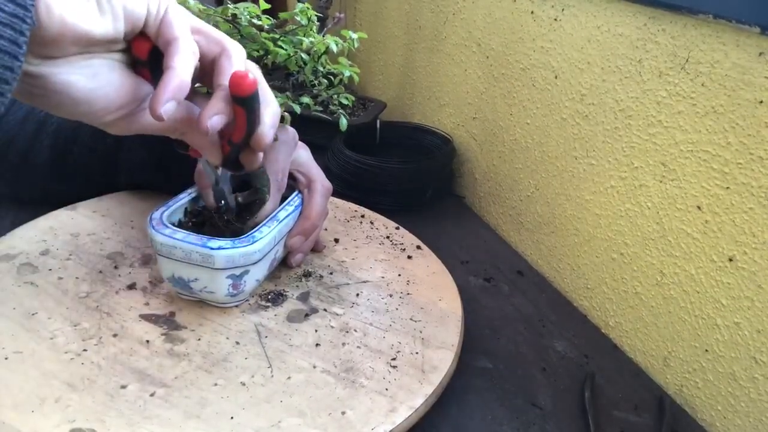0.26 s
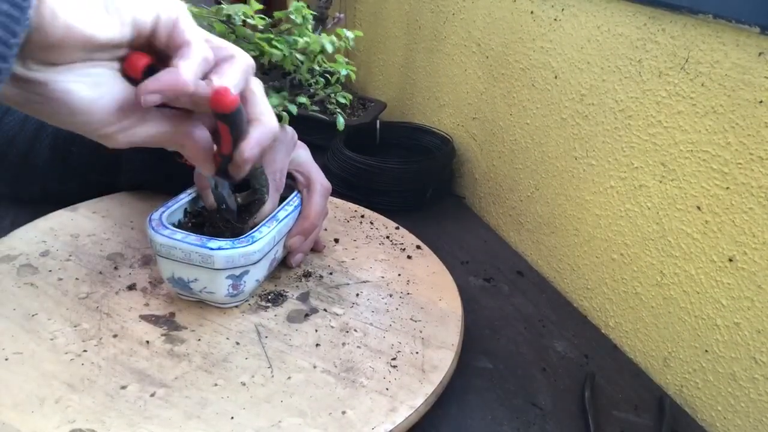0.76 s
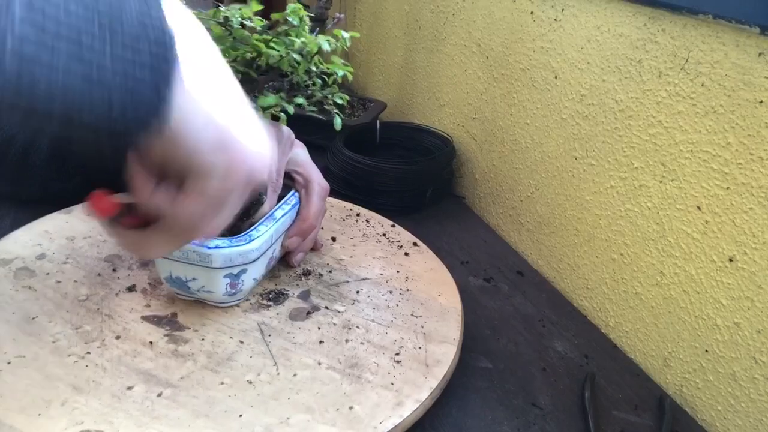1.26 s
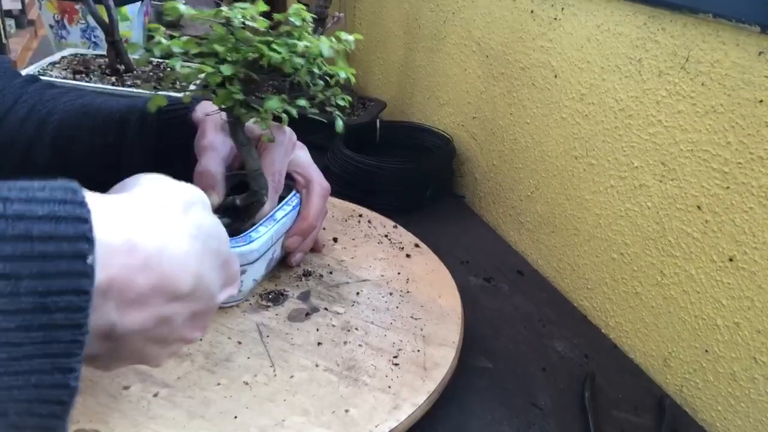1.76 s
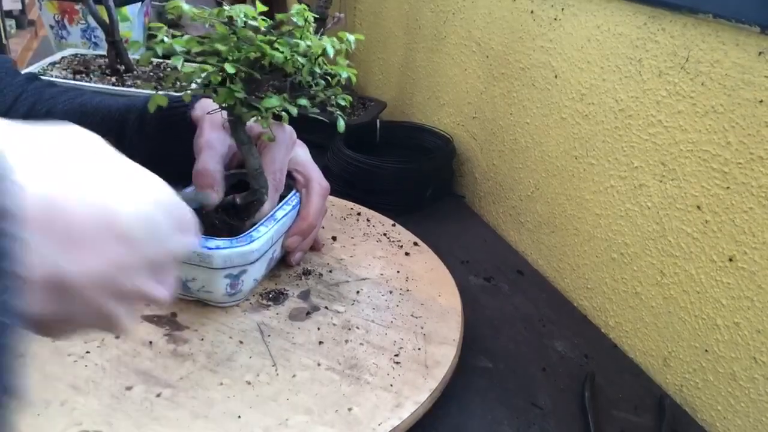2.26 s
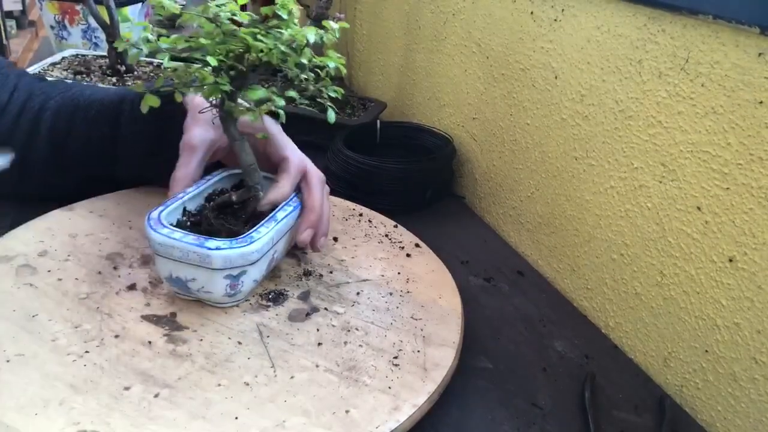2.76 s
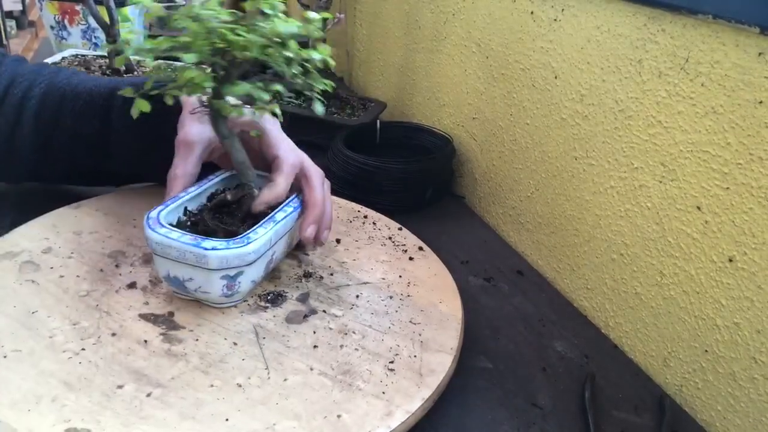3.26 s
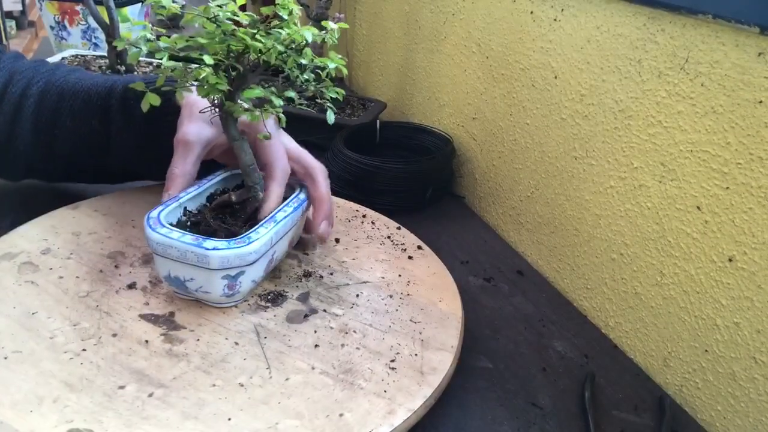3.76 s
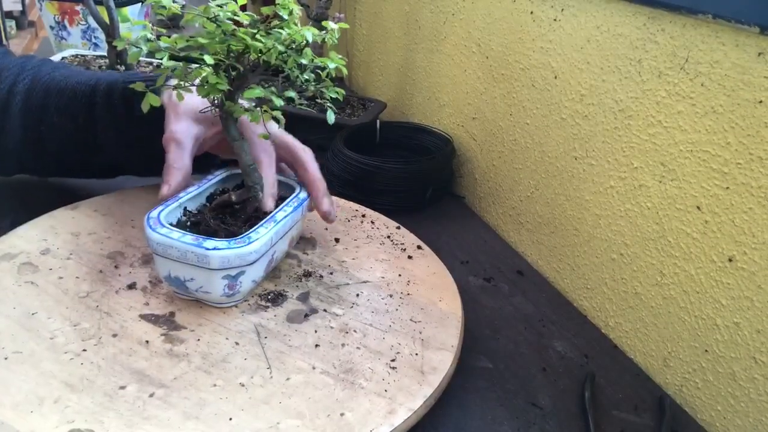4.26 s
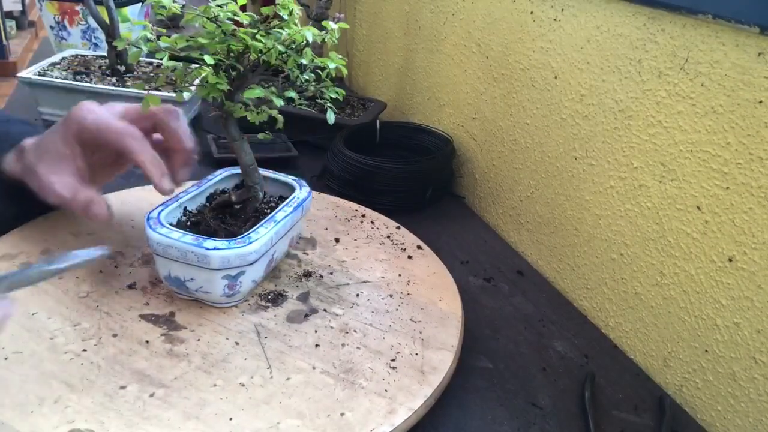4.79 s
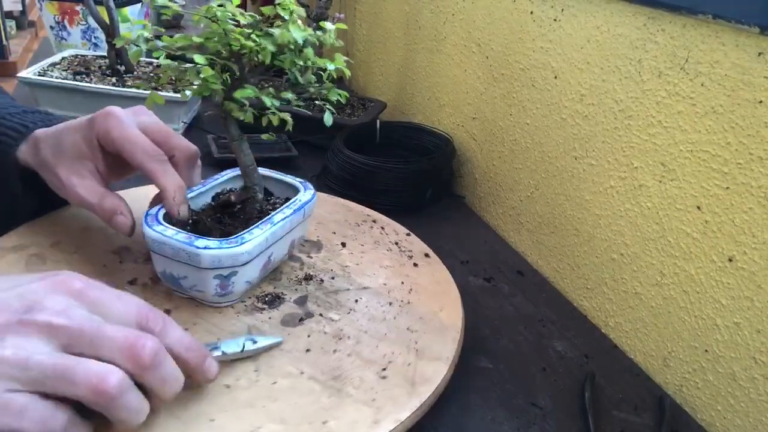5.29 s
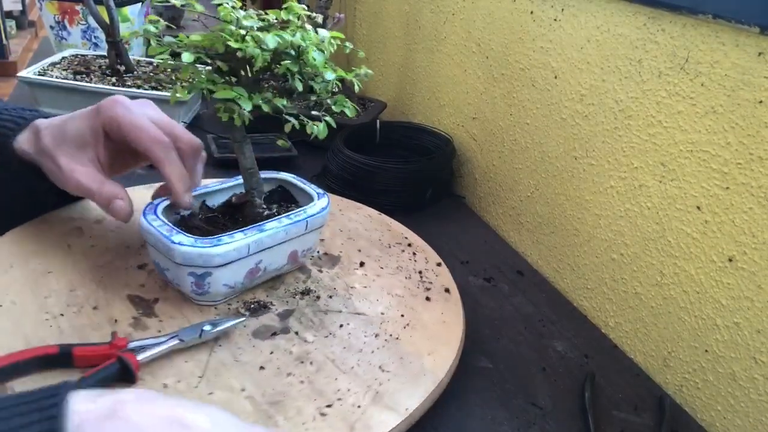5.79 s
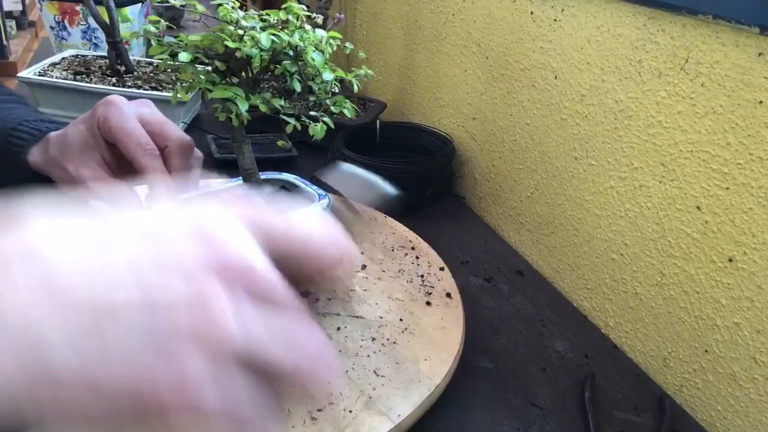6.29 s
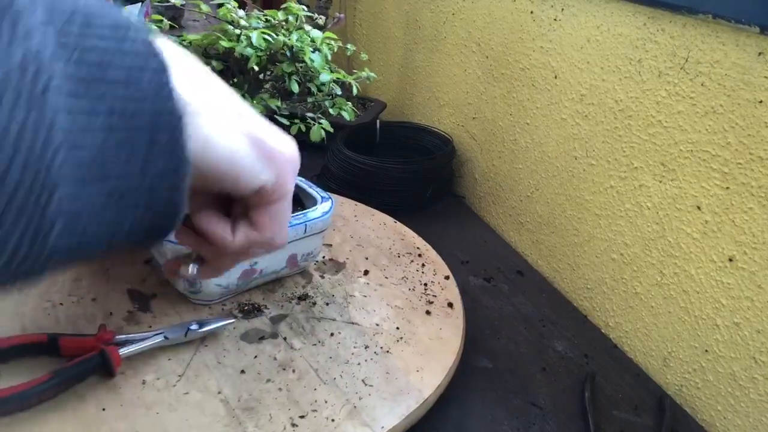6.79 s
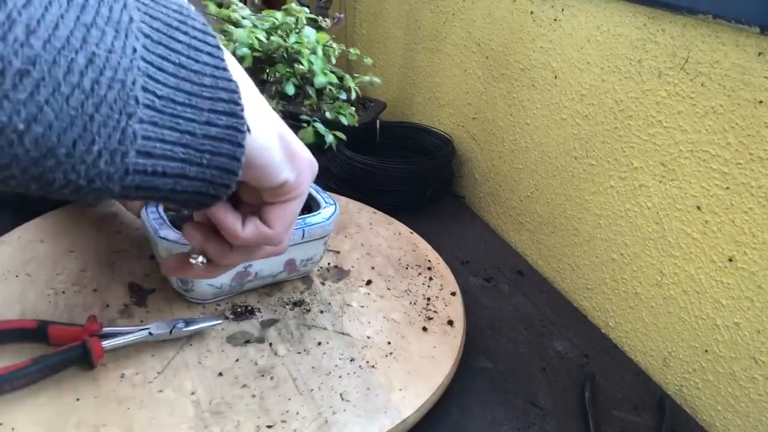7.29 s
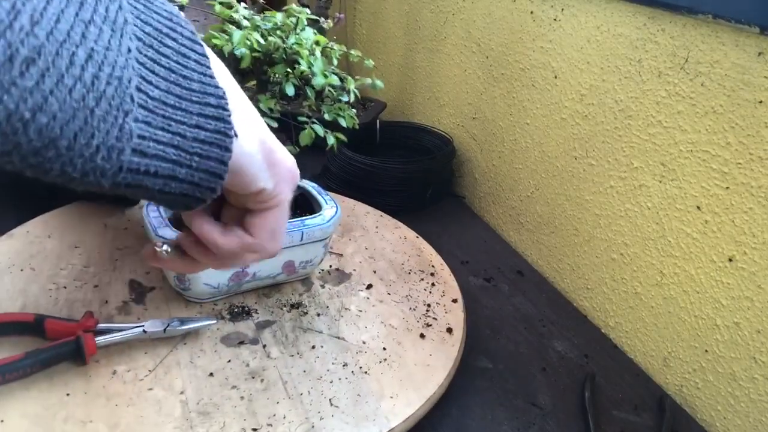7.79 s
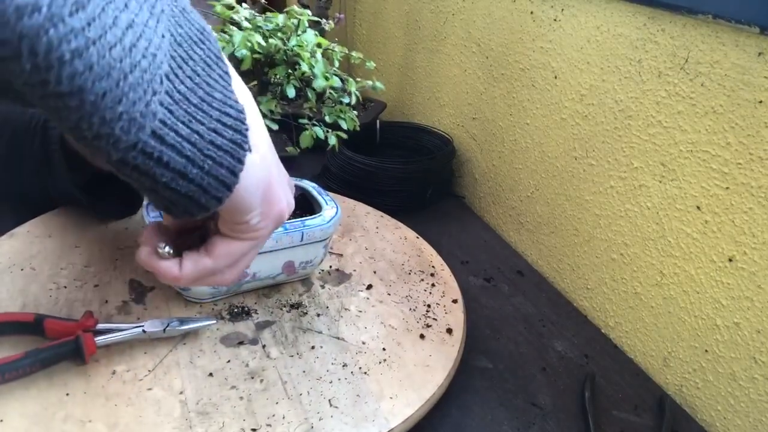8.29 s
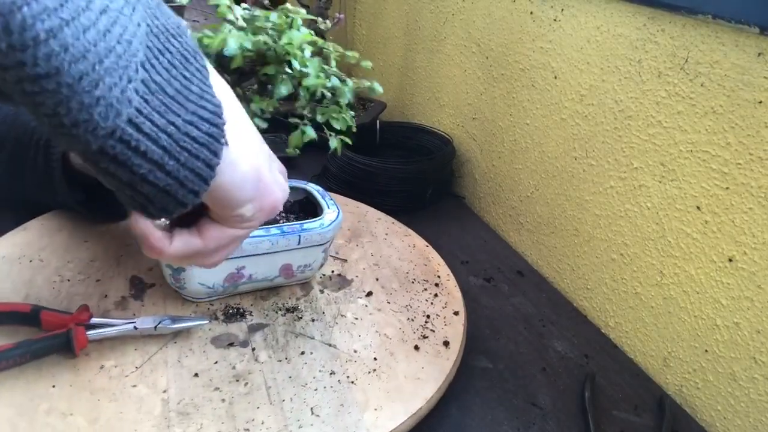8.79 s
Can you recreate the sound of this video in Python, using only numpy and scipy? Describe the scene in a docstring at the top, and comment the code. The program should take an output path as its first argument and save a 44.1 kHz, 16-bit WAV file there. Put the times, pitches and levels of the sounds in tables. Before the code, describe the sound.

Quiet close handling of a glazed pot on a wooden board, a sudden bouncing clatter of pliers, then ceramic knocks and a sharp wire snip.

```python
"""Wiring a small glazed pot

Pliers twist a thin wire tight in a pot, which rocks, grinds and clinks on a round wooden work table.
The pliers clatter down, cutters are dragged off the board, knock against the pot and snip the wire.
Blows are short noise bursts and dying tones; scrapes, rubbing and rustle are tiny random slips,
filtered to the sound of each body. Hands and sleeves rustle; the walls of a quiet yard answer."""
import sys
import numpy as np
from scipy import signal
from scipy.fft import rfft, irfft, next_fast_len
from scipy.io import wavfile
from scipy.ndimage import map_coordinates

SR = 44100
rng = np.random.default_rng(int(sys.argv[2]) if len(sys.argv) > 2 else 0)


def master_out(mix):
    """Clip the mix to full scale and print it as 16-bit PCM to the path in sys.argv[1]."""
    frames = np.transpose(np.atleast_2d(mix))
    ceiling = np.clip(frames, -1, 1)
    pcm = np.round(ceiling * 32767).astype(np.int16)
    wavfile.write(sys.argv[1], SR, pcm)


N = 399105  # length in samples
T = np.arange(SR // 2) / SR  # the life of one blow (s)


def amp(db):
    """Turn dB into gain."""
    return 10 ** (np.asarray(db) / 20)


def unit(x):
    """Scale x to rms 1."""
    return x / np.sqrt(np.mean(x ** 2) + 1e-20)


def along(points, hz):
    """Read a curve of (f/Hz, value) points, straight on a log frequency axis."""
    f, v = np.transpose(points)
    return np.interp(np.log(hz + 1), np.log(f + 1), v)


def wobble(rate):
    """A smooth random curve with rate knots a second."""
    knots = rng.standard_normal(int(N * rate / SR) + 4)
    return map_coordinates(knots, [np.arange(N) * rate / SR])


def coloured(x, level):
    """Filter x, without any pre-echo, so that its gain in dB is level(Hz)."""
    m = 2 * next_fast_len(len(x) // 2 + 4096)
    cepstrum = irfft(np.log(amp(level(np.fft.rfftfreq(m, 1 / SR))) + 1e-6))
    # folding the cepstrum forward in time gives the minimum-phase filter
    cepstrum[1:m // 2] *= 2
    cepstrum[m // 2 + 1:] = 0
    return irfft(rfft(x, m) * np.exp(rfft(cepstrum)))[:len(x)]


def shaped(x, spectrum):
    """Filter x along a table of (f/Hz, level/dB) points."""
    return coloured(x, lambda hz: along(spectrum, hz))


def add(track, s, sound):
    """Mix a sound in at time s."""
    part = track[max(round(s * SR), 0):][:len(sound)]
    part += sound[:len(part)]


# how long the yard echoes: f/Hz, time to fall by 60 dB t60/s
YARD = [(90, 0.57), (260, 0.477), (700, 0.34), (2000, 0.36), (5000, 0.31), (14000, 0.29)]


def in_yard(x, wet_db):
    """Add a fresh diffuse echo in which each frequency dies at its own speed."""
    hz, t, z = signal.stft(rng.standard_normal(len(T)), SR, nperseg=256)
    fade = amp(-60 * t / along(YARD, hz)[:, None])
    tail = signal.istft(z * fade, SR, nperseg=256)[1][:len(T)]
    tail *= 1 - np.exp(-T / 0.0023)  # the echo swells in softly
    return x + amp(wet_db) * signal.fftconvolve(x, tail / np.linalg.norm(tail))[:len(x)]


def burst(spectrum, t60, chatter_db):
    """A sharp push and its dying micro-contacts, filtered; rms 0.1 over half a second."""
    chatter = rng.standard_normal(len(T)) * np.exp(-np.log(1000) * T / t60)
    force = amp(chatter_db) * chatter / np.linalg.norm(chatter)
    force[0] += 1
    return unit(shaped(force, spectrum)) / 10


def ring(modes, colour, rise, scatter_db):
    """Dying tones that build up over a few cycles; strengths and pitches vary from blow to blow."""
    hz, db, t60 = np.transpose(modes)[:, :, None]
    chance = rng.standard_normal((len(modes), 2, 1))
    level = amp(db + along(colour, hz) + scatter_db * chance[:, 0])
    life = np.exp(-np.log(1000) * T / t60) * (1 - np.exp(-(T * hz / rise) ** 2))
    tones = np.sin(2 * np.pi * hz * T * (1 + 0.0095 * chance[:, 1]))
    return np.sum(level * life * tones, axis=0)


def grit(rate, spread_db, smooth):
    """Friction force: rate tiny uneven slips a second over a smooth hiss, bunched in clumps."""
    sizes = rng.standard_normal(N) * amp(spread_db * rng.standard_normal(N))
    slips = (rng.random(N) < rate / SR) * sizes
    clumps = amp(2.5 * wobble(160))
    return unit(clumps * (unit(slips) + smooth * rng.standard_normal(N)))


def through(force, resonances, valley_db, bright):
    """Friction heard through a body's resonances, tilted by bright dB per octave above 1 kHz; rms 1."""
    def level(hz):
        power = amp(2 * valley_db) * (hz > resonances[0][0])  # the floor between the peaks
        for centre, width, db in resonances:
            power = power + amp(2 * db) / (1 + (2 * (hz - centre) / width) ** 2)
        return 10 * np.log10(power) + bright * np.log2(np.maximum(hz, 1000) / 1000)

    return unit(coloured(force, level))


def strokes(rows, resonances, force, valley_db):
    """Short friction strokes sounding through a body's resonances."""
    out = np.zeros(N)
    for start, end, db, bright in rows:
        slips = force[int(start * SR):][:max(int((end - start) * SR), 64)]
        slips = slips * signal.windows.tukey(len(slips), .4)
        slips = np.pad(slips, (0, len(slips)))  # room for the body to ring on
        add(out, start, amp(db) * through(slips, resonances, valley_db, bright))
    return out


# the steady hush: f/Hz, level/dB
AIR = [(15, -53.5), (25, -20.5), (53, -4.5), (117, -4), (206, -6), (317, -7), (354, -8), (936, -17),
       (1560, -22), (1940, -24), (4870, -26.5), (5280, -26), (16000, -35)]


def air():
    """The steady hush of the yard: filtered noise."""
    return amp(-69.5) * unit(shaped(rng.standard_normal(N), AIR))


MOVE_ATTACK_S, MOVE_RELEASE_S = 0.018, .07  # half the fade-in, the whole fade-out


def held(start, end):
    """Attack, hold and release of one movement of the hand."""
    t = np.arange(N) / SR
    attack = np.interp(t, [start - MOVE_ATTACK_S, start + MOVE_ATTACK_S], [0, 1])
    return attack * np.interp(t, [end, end + MOVE_RELEASE_S], [1, 0])


# the hands twist, steady the pot or reach for a tool:
# start t/s, end t/s, effort level/dB, rustle over effort level/dB
MOVES = [(0.0, 0.165, -66.5, -14), (0.686, 1.06, -64, -9.5), (1.02, 1.396, -69, -5.5),
         (1.46, 1.806, -68.5, -5.5), (1.812, 2.026, -66, -27), (2.093, 2.268, -58, -10),
         (2.36, 3.32, -72, -7.5), (3.856, 3.96, -74, -5), (4.327, 5.212, -77.5, -2),
         (5.227, 5.633, -58, -11), (6.046, 6.17, -62.5, -5), (6.178, 6.487, -71, -1.5),
         (6.5, 6.887, -75.5, -2.5), (6.873, 7.947, -67, -10.5), (8.122, 8.474, -68.5, -11),
         (8.877, 8.993, -57, -11)]
# low rumble of the table: f/Hz, level/dB per Hz
RUMBLE = [(21, -51.5), (35, -28), (76, 2.5), (108, 0), (176, 1), (294, -13), (400, -10), (502, -22),
          (559, -9), (600, -28.5), (780, -44), (1320, -120)]
# rubbing on the wood: f/Hz, level/dB per Hz
RUB = [(260, -57), (450, -10.5), (526, -6), (846, 2), (1130, -6.5), (1310, -8), (1910, -15.5),
       (2020, -19.5), (2420, -15.5), (3270, -23), (4000, -20.5), (5200, -50.5), (8800, -120)]
# sleeves and leaves: f/Hz, level/dB
RUSTLE = [(1180, -24.5), (2000, -5), (2710, -1), (3200, -7), (4530, -4.5), (4990, -3), (5780, -9),
          (7570, -6), (9330, -18), (13100, -12), (16000, -15)]


def handling():
    """With each move the table rumbles, the pot's foot rubs on it, and sleeves and leaves rustle."""
    effort, brushing = np.zeros(N), np.zeros(N)
    for start, end, db, rustle_db in MOVES:
        move = amp(db) * held(start, end)
        effort = np.maximum(effort, move)
        brushing = np.maximum(brushing, amp(rustle_db) * move)
    rumble = unit(shaped(rng.standard_normal(N), RUMBLE)) * amp(1.9 * wobble(25))
    rub = unit(shaped(grit(rate=220, spread_db=1.5, smooth=0.63), RUB)) * amp(-5 + 1.1 * wobble(21))
    crinkle = grit(rate=700, spread_db=3, smooth=1.2)  # small catches of wool and leaves
    rustle = unit(shaped(crinkle, RUSTLE)) * amp(1.1 * wobble(48))
    return effort * rumble + in_yard(effort * rub + brushing * rustle, wet_db=-17)


# the pot's foot judders: start t/s, end t/s, level/dB before trim, brightness/dB per octave
SKIDS = [(0.0, 0.03, -50, -5), (0.022, 0.06, -49.5, -27), (0.89, 0.955, -50, -4), (0.965, 1.045, -56.5, 1),
         (2.105, 2.135, -45, -0.5), (2.14, 2.26, -55.5, 2), (8.715, 8.735, -38, -4.5),
         (8.95, 8.995, -58, -6)]
# resonances of the foot on wood: f/Hz, width/Hz, level/dB
SOLE = [(805, 44, 2), (834, 37, 2.5), (990, 68, -5)]


def skids():
    """The pot's foot judders across the wood in uneven slips."""
    force = grit(rate=840, spread_db=3.0, smooth=0.8)
    return in_yard(amp(-7) * strokes(SKIDS, SOLE, force, valley_db=-32.0), wet_db=-11.5)


# steel on wire and rim: start t/s, end t/s, level/dB before trim, brightness/dB per octave
GRINDS = [(0.0, 0.055, -70, -0.5), (0.875, 0.975, -57.5, -7), (0.905, 0.945, -54, -5.5),
          (2.1, 2.137, -54, -3), (5.94, 5.995, -46, -11.5), (8.904, 8.919, -45, -6),
          (8.934, 8.96, -48.5, -7), (8.957, 8.983, -45.5, -10)]
# resonances of the rim: f/Hz, width/Hz, level/dB
RIM = [(643, 20, -7), (873, 34, -2.5), (1350, 40, -4), (2347, 53, 0), (2780, 460, -6), (3700, 76, -1.5),
       (4240, 54, -2.5), (4860, 210, -3)]


def grinds():
    """Steel grinds on wire and rim, and its slips excite the rim's resonances."""
    force = grit(rate=1100, spread_db=2, smooth=.4)
    return in_yard(amp(-2) * strokes(GRINDS, RIM, force, valley_db=-17), wet_db=-11.5)


# light strokes along the glaze: start t/s, end t/s, level/dB before trim, brightness/dB per octave
GLIDES = [(0.0, 0.07, -83, 22), (0.96, 1.2, -72, 1), (1.5, 1.66, -64, -11.5), (2.405, 2.525, -55, -8),
          (3.15, 3.35, -80, 1), (3.86, 3.96, -67.5, 5)]
# resonances of the glaze: f/Hz, width/Hz, level/dB
GLAZE = [(1460, 280, -6.5), (1970, 140, -2.5), (4920, 120, 17), (5940, 200, -21), (7660, 400, -3)]


def glides():
    """Steel strokes lightly along the glaze, in many fine slips."""
    force = grit(rate=2500, spread_db=-7, smooth=0.79)
    return in_yard(amp(-12) * strokes(GLIDES, GLAZE, force, valley_db=-17), wet_db=-11.5)


# wire and jaws tick: t/s, level/dB before trim, treble over middle level/dB
TICKS = [(0.1615, -58.5, -6), (0.8397, -54.5, -2), (1.337, -60, -25), (1.485, -60.5, -17), (1.67, -63, -31),
         (1.844, -56.5, -23), (2.3105, -56.5, -12), (4.3598, -56.5, -17.5), (4.5537, -61.5, -13),
         (5.6982, -30.5, -1.5), (6.0372, -29, -25), (7.101, -64, -7), (7.445, -61, -4),
         (7.8516, -40.5, -20.5), (7.8997, -57.5, -14)]
# sound of one tick: f/Hz, level/dB per Hz
TICK = [(500, -15), (1200, -1), (2500, -1.5), (3800, 0.5), (5300, 5.5), (7300, 5.5), (9500, -1.5),
        (16000, -18.5)]


def ticks():
    """Wire and jaws tick as they shift: short bright bursts."""
    out = np.zeros(N)
    for s, db, treble in TICKS:
        tick = burst(TICK, t60=0.037, chatter_db=23.0)
        tick = shaped(tick, [(2500, -treble / 2), (6000, treble / 2)])
        add(out, s, amp(db - 3) * in_yard(tick, wet_db=-10.0))
    return out


# tones of the table top: f/Hz, level/dB, time to fall by 60 dB t60/s
TABLE = [(79, 3, .5), (104, -11, .16), (150, -10, .08), (171, -6, .11), (210, -13, .05), (262, -9, .07),
         (330, -11, .04), (405, -11, .07)]
HEAVY_DB = -24  # a bump this heavy sways the whole stand
LIGHT_LOSS = 0.48  # dB lost by the deepest tone for each dB a bump is lighter


def boom(db):
    """The table top's ring; the lighter the bump, the weaker its deepest tone."""
    colour = [(80, LIGHT_LOSS * (db - HEAVY_DB)), (150, 0.0095)]
    return amp(db) * ring(TABLE, colour, rise=0.71, scatter_db=7.5)


def rock(start_hz, end_hz, settle, t60):
    """The foot bounces on the wood; the contact softens as the load eases, so its pitch falls."""
    hz = end_hz + (start_hz - end_hz) * np.exp(-T / settle)
    hz = hz * (1 + 0.031 * rng.standard_normal())
    life = np.exp(-np.log(1000) * T / t60) * (1 - np.exp(-T / 0.00058))
    return np.sin(2 * np.pi * np.cumsum(hz) / SR) * life


# tones of the pot on its table: f/Hz, level/dB, time to fall by 60 dB t60/s
POT = [(658, -14, 0.18), (816, -11.5, 0.098), (928, -3, 0.036), (1340, -2, 0.029), (1537, 1, 0.025),
       (1964, -3.5, 0.097), (2025, -10, 0.029), (2633, -9.5, 0.054), (2540, -7, 0.013), (4550, -4.5, 0.027),
       (4940, 7, 0.016), (5200, -8.5, 0.013), (6460, 2, 0.022), (8380, -13, 0.027), (10140, -11.5, 0.026)]
# chatter of the foot: f/Hz, level/dB per Hz
FOOT = [(200, -27.5), (550, -5.5), (720, 11.5), (850, 5.5), (1050, -19), (1350, -26), (2500, -13),
        (6000, -58)]


def pot_blow(knock, wall, ping, thump):
    """One contact: the foot rocks and chatters, wall and glaze ring, the table thumps (all in dB)."""
    colour = [(1100, knock), (1900, wall), (2900, wall), (4500, ping)]
    clink = amp(1.0) * ring(POT, colour, rise=1.18, scatter_db=2.66)
    clink += amp(ping - 12.0) * burst(TICK, t60=0.045, chatter_db=-3)
    clink += amp(knock - 6.5) * rock(start_hz=1042, end_hz=677.5, settle=0.01127, t60=0.11)
    clink += amp(knock - 12) * burst(FOOT, t60=.06, chatter_db=8)
    clink += amp(thump + 4.0) * burst(RUMBLE, t60=0.23, chatter_db=6.5)
    clink += boom(thump - 7)
    return in_yard(clink, wet_db=-10)


# the pot is knocked and rocks, all before each part's trim: t/s, foot knock level/dB,
# hardness (wall's ring over the knock) level/dB, table's thump over the knock level/dB
POT_HITS = [(0.325, -53, -43, -3.5), (1.123, -43, -24, -12), (1.215, -49.5, -39, -34),
            (1.713, -42, -30, -1.5), (1.947, -42.5, -26, -5), (2.436, -44.5, -15, -15),
            (2.544, -52.5, -12, 4.5), (2.859, -45, -23, -5.5), (2.939, -34, -29, -19),
            (3.32, -55, -13, 1.5), (7.066, -32, 0, -18.5), (7.209, -59, -11, -5), (7.409, -40, -7.5, -21.5),
            (7.424, -36, -33, -12), (7.542, -44.5, -27, -22), (7.691, -23.5, -9.5, -25.5),
            (7.793, -46, -36, -10.5), (7.936, -40, -21, -25), (8.151, -51, -40, -30),
            (8.294, -34, -20.5, -21), (8.734, -35, -23.5, -13), (8.891, -48, -15, 1.5)]
# steel tips graze the glaze and miss the foot:
# t/s, wall level/dB, ping over the wall's ring level/dB
TINKS = [(2.946, -44.5, -4), (3.062, -46, 0.5)]
GLAZE_DB = -17  # on a knock, the glaze's ping over the wall's ring
TINK_KNOCK_DB = -23  # what reaches foot and table from a graze


def pot():
    """Soft contacts rock the pot on its foot and thump the table; hard ones also ring wall and glaze."""
    out = np.zeros(N)
    for s, db, hardness, thump in POT_HITS:
        wall = db + hardness
        add(out, s, pot_blow(db, wall, wall + GLAZE_DB, db + thump))
    for s, db, ping in TINKS:
        add(out, s, pot_blow(db + TINK_KNOCK_DB, db, db + ping, db + TINK_KNOCK_DB))
    return out


# hands and padded handles bump the table: t/s, level/dB
BUMPS = [(0.723, -48.5), (0.772, -58), (1.05, -50.5), (1.352, -53), (1.844, -59), (1.874, -51), (2.24, -58),
         (4.889, -50.5), (5.409, -29.5), (5.511, -36), (5.695, -48), (5.901, -54), (6.008, -34.5),
         (6.949, -57), (8.205, -51), (8.37, -50), (8.681, -44)]


def table():
    """The round top booms briefly on its stand when bumped."""
    out = np.zeros(N)
    for s, db in BUMPS:
        add(out, s, boom(db))
    return out


# skin and sleeve against leaves and soil:
# start t/s, end t/s, level/dB before trim, brightness/dB per octave
BRUSHES = [(1.74, 1.79, -61, -4.5), (2.085, 2.11, -71, -1), (2.225, 2.275, -60, -2.5),
           (3.225, 3.275, -65, -3), (3.85, 3.885, -68.5, -0.5), (4.975, 5.12, -62.5, -3),
           (6.89, 6.93, -60.5, -8.5), (7.57, 7.62, -67, -2.5)]
# broad resonances of the leaves: f/Hz, width/Hz, level/dB
LEAVES = [(1800, 850, -2.5), (2830, 800, -1), (4930, 1100, 2.5), (7300, 1200, 3.5), (13000, 3700, -3)]


def brushes():
    """Skin and sleeve brush past leaves and soil in small catches."""
    force = grit(rate=540, spread_db=0, smooth=0.71)
    return in_yard(amp(-6.5) * strokes(BRUSHES, LEAVES, force, valley_db=-19.5), wet_db=-11.5)


# dull blows on the board: t/s, level/dB, bass relative level/dB, clack relative level/dB
THUDS = [(4.885, -55.5, 6, -1), (5.693, -32, 4, -8), (5.769, -18.5, -4.5, -0.5), (6.005, -27, 10, -5),
         (6.0137, -19.5, -3, -1.5), (6.019, -23, -8.5, 1.5), (6.034, -29, -19, 8), (6.046, -34, 9, 5),
         (6.062, -51, -14, -10), (6.091, -36.5, 6.5, -21)]
# sound of the struck board: f/Hz, level/dB per Hz
BOARD = [(40, -22.5), (90, -7), (250, 2.5), (450, 0.5), (950, -3), (1150, -3), (1350, 0), (1600, -6),
         (2200, -7.5), (2900, -20), (3700, -18.5), (5000, -36), (8000, -39), (15000, -55.5)]


def thuds():
    """Padded handles and knuckles knock the board as the cutters are taken up."""
    out = np.zeros(N)
    for s, db, bass, clack_db in THUDS:
        push = burst(BOARD, t60=.025, chatter_db=6)
        blow = shaped(push, [(450, bass), (1300, clack_db)])
        add(out, s, amp(db) * in_yard(blow, wet_db=-6.0))
    return out


def clack(hz, arrival, length):
    """The first bending wave of a blow: a short packet that passes before the tones ring on."""
    packet = np.exp(-((T - arrival) / length) ** 2)
    return packet * np.sin(2 * np.pi * hz * T * (1 + 0.029 * rng.standard_normal()))


# the pliers land and bounce:
# t/s, pitch of the contact f/Hz, level/dB, crack over the blow level/dB before trim
PLIER_HITS = [(5.267, 1170, -45, -6), (5.303, 2720, -42, 1), (5.3162, 1605, -14.5, -13),
              (5.3345, 2500, -39, -6), (5.345, 1680, -19.5, -10.5), (5.358, 1500, -18, -14),
              (5.3861, 1000, -18, -17), (5.395, 835, -22.5, -22), (5.441, 1013, -27, -17.5),
              (5.467, 830, -23.5, -31), (5.502, 1700, -20.5, -10), (5.507, 994, -24.5, -11)]
# tones of pliers lying on the board: f/Hz, level/dB, time to fall by 60 dB t60/s
PLIERS = [(395, -6.5, 0.076), (562, -15, 0.28), (665, -5.5, 0.15), (818, 1.5, 0.075), (945, 5, 0.021),
          (1323, -7.5, 0.075), (1512, -9.5, 0.06), (1637, -3.5, 0.095), (1816, -8.5, 0.044),
          (2080, -20.5, 0.033), (2487, -11, 0.024), (2740, -4.5, 0.035), (3570, -6, 0.028),
          (4234, -12.5, 0.035), (4434, -16.5, 0.0293), (5220, -16, 0.045)]
# crack of the contact: f/Hz, level/dB per Hz
CRACK = [(1180, -24), (2000, 3.5), (2550, -3), (2780, -4.5), (3120, -19.5), (3680, -13.5), (6200, -26),
         (16000, -55)]
OFF_PITCH_DB_PER_OCTAVE = 5  # tones far from the pitch of a contact are struck less


def pliers():
    """Jaws and handles hit the board and bounce; each contact favours the tones near its own pitch."""
    out = np.zeros(N)
    for s, hz, db, crack in PLIER_HITS:
        colour = [(f, -OFF_PITCH_DB_PER_OCTAVE * abs(np.log2(f / hz))) for f in (400, 800, 1600, 2300)]
        colour += [(3500, crack)]
        hit = amp(0.5) * ring(PLIERS, colour, rise=3.6, scatter_db=1.5)
        hit += amp(6) * clack(hz, arrival=.0028, length=.0011)
        hit += amp(crack + 1.0) * burst(CRACK, t60=0.026, chatter_db=10.5)
        hit += amp(-13) * burst(BOARD, t60=0.086, chatter_db=7.5)
        add(out, s, amp(db) * in_yard(hit, wet_db=-10.5))
    return out


# the pliers skate as they land: start t/s, end t/s, level/dB before trim, brightness/dB per octave
SLIDES = [(5.33, 5.43, -50, -4.5)]
# resonances of the steel blades: f/Hz, width/Hz, level/dB
BLADES = [(4800, 1800, -3.5), (5617, 330, -0.5), (7600, 600, 1), (9300, 600, -2), (10420, 220, 0),
          (12830, 190, -1.5), (14200, 300, -2.5)]


def slides():
    """The pliers skate over the board as they land, and the steel hisses."""
    force = grit(rate=5000, spread_db=0, smooth=0.65)
    return in_yard(amp(-7.5) * strokes(SLIDES, BLADES, force, valley_db=-20.5), wet_db=-11.5)


# the jaws jingle as the cutters are taken up: t/s, level/dB before trim
JINGLES = [(5.7, -52), (5.824, -49), (5.847, -43.5), (5.861, -47), (5.971, -35), (5.982, -55)]
# tones of the cutters: f/Hz, level/dB, time to fall by 60 dB t60/s
CUTTERS = [(5200, -18, 0.038), (6850, -0.5, 0.041), (7000, -7, 0.06), (9000, -8, .06), (10350, -9.5, 0.08),
           (12300, -6, 0.13), (12650, -15, .11), (14220, -7, 0.12)]


def cutters():
    """Small steel jaws ring high and briefly."""
    out = np.zeros(N)
    for s, db in JINGLES:
        jingle = ring(CUTTERS, [(5000, 0.027)], rise=2, scatter_db=10)
        add(out, s, amp(db - 9) * in_yard(jingle, wet_db=-12.0))
    return out


# the pull of the cutters across the board: t/s, scrape level/dB before trim
DRAG = [(5.73, -51), (5.772, -59), (5.802, -66), (5.848, -58), (5.936, -58), (5.978, -40.5), (5.998, -47.5),
        (6.032, -39.5), (6.09, -70)]
WOOD_DB, WOOD_GROWS = -42, 0.34  # rubbing at the hardest pull; its dB for each dB of scrape


def drag():
    """The cutters are pulled across the board: blades hiss and wood rubs, both following the pull."""
    s, db = np.transpose(DRAG)
    pull_db = np.interp(np.arange(N) / SR, s, db)
    force = grit(rate=1300, spread_db=2, smooth=.5)
    blades = amp(pull_db + 1.5) * through(force, BLADES, valley_db=-15, bright=-6.5)
    wood = unit(shaped(grit(rate=600, spread_db=4, smooth=.5), RUB))
    wood += amp(-1.5) * unit(shaped(rng.standard_normal(N), RUMBLE))
    wood *= amp(WOOD_DB + WOOD_GROWS * (pull_db - db.max()))
    return in_yard(held(s[0], s[-1]) * (blades + wood), wet_db=-10)


# the wire parts: f/Hz, level/dB per Hz
SNIP = [(530, -22.5), (900, -28), (1340, -32), (1600, -17), (2250, -3), (2660, -23), (3190, -12),
        (4050, -24.5), (4680, -10.5), (5480, -9.5), (6330, -12), (6800, -24), (12900, -29), (14000, -26),
        (16000, -39.5)]


def snip():
    """The cutters snap through the wire and jolt the table: a sharp burst, a tick and a rumble."""
    out = np.zeros(N)
    cut = amp(-27) * burst(SNIP, t60=0.0089, chatter_db=7.0)
    cut += amp(-45.5) * burst(TICK, t60=0.096, chatter_db=11)
    cut += amp(-37) * burst(RUMBLE, t60=0.3, chatter_db=9)
    add(out, 8.683, in_yard(cut, wet_db=-12))
    return out


def scene():
    """Everything at one close microphone."""
    rubbing = skids() + grinds() + glides() + brushes() + slides() + drag()
    blows = ticks() + pot() + table() + thuds() + pliers() + cutters() + snip()
    return (air() + handling() + rubbing + blows)[None]


TOP_HZ = 15900  # nothing is kept from here up


def record(dry):
    """The microphone's limits: deep bass fades below 45 Hz and the treble stops at TOP_HZ."""
    x = signal.sosfilt(signal.butter(2, 45, "highpass", fs=SR, output="sos"), dry)
    m = next_fast_len(N + SR // 2)
    return irfft(rfft(x, m) * (np.fft.rfftfreq(m, 1 / SR) < TOP_HZ), m)[:, :N]


dry = scene()
out = record(dry)
master_out(out)
```